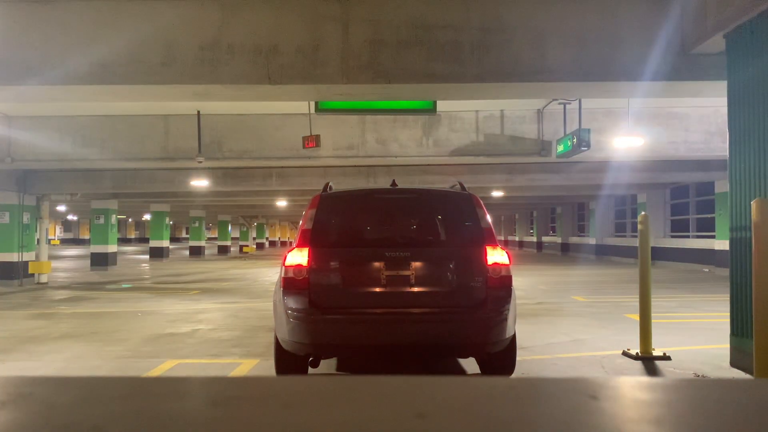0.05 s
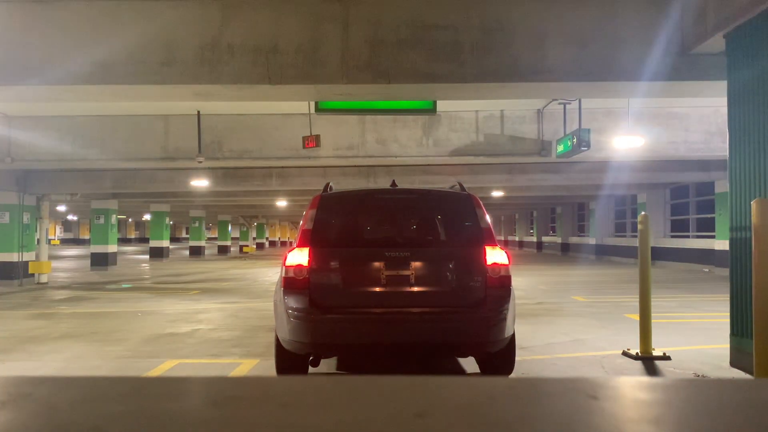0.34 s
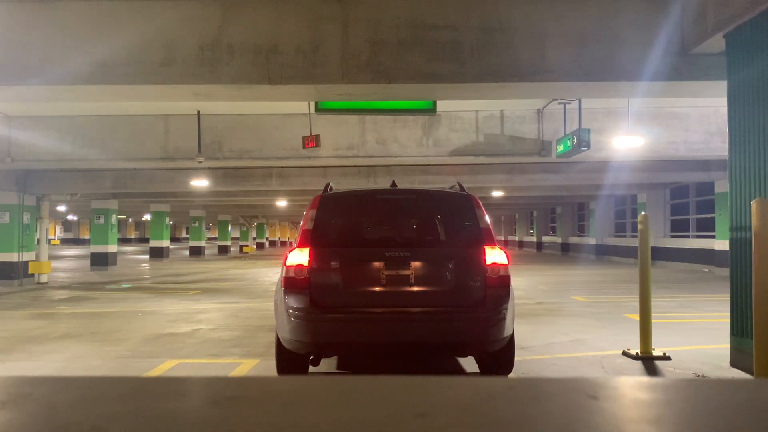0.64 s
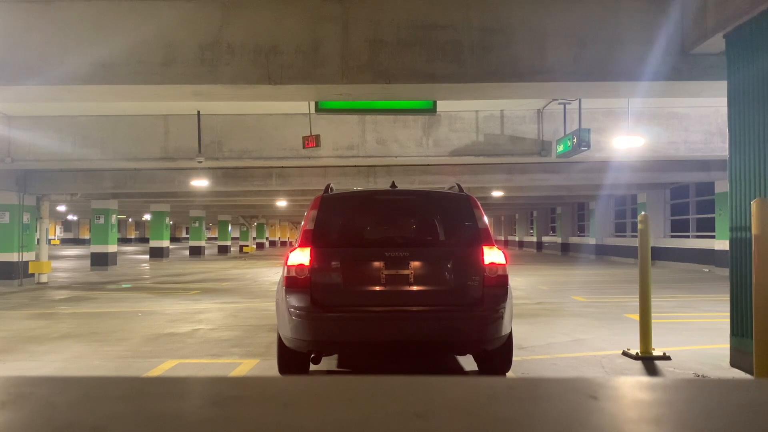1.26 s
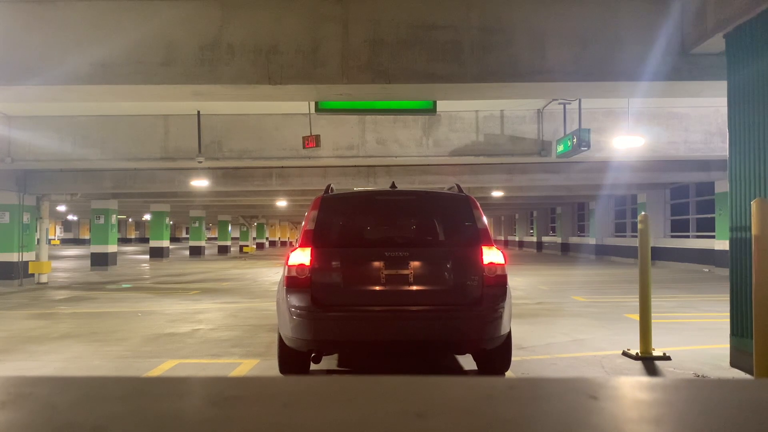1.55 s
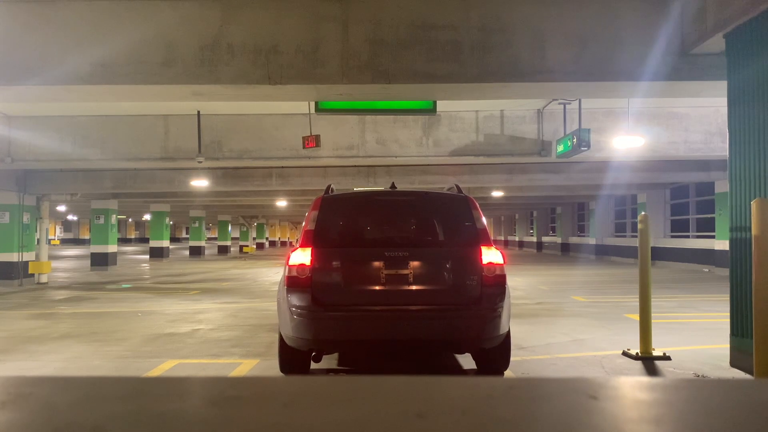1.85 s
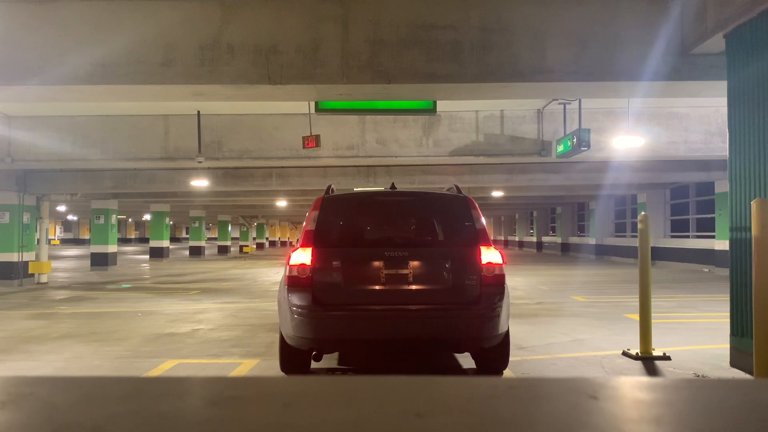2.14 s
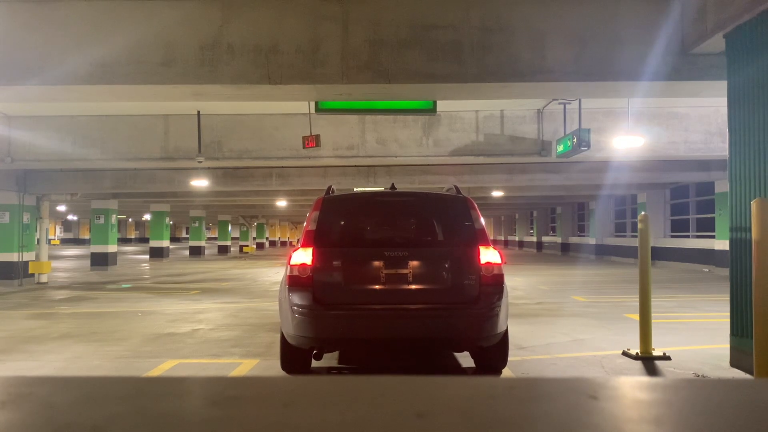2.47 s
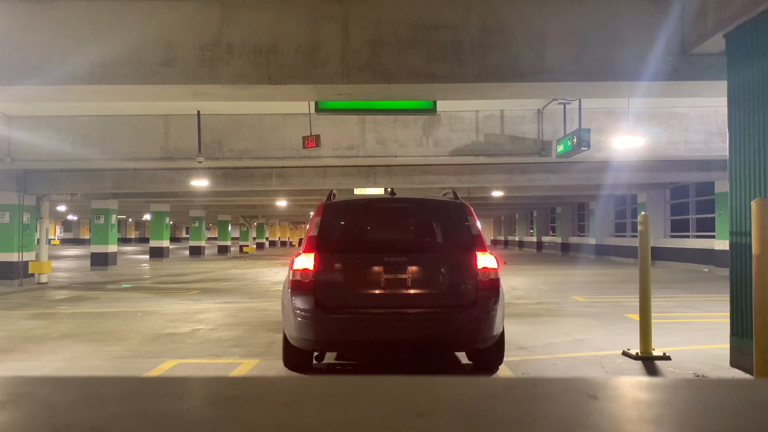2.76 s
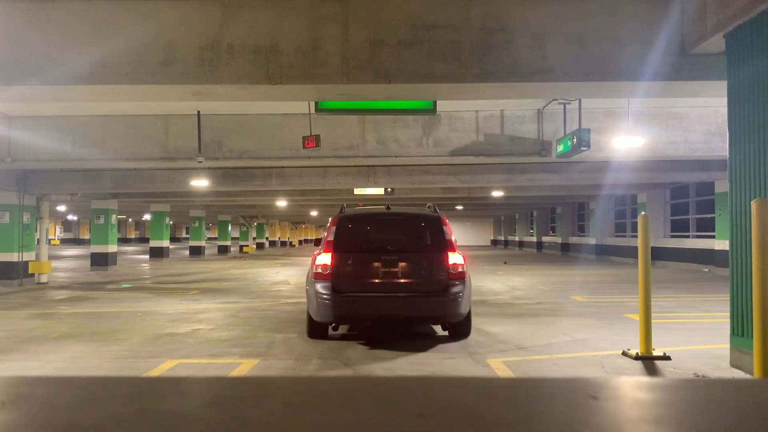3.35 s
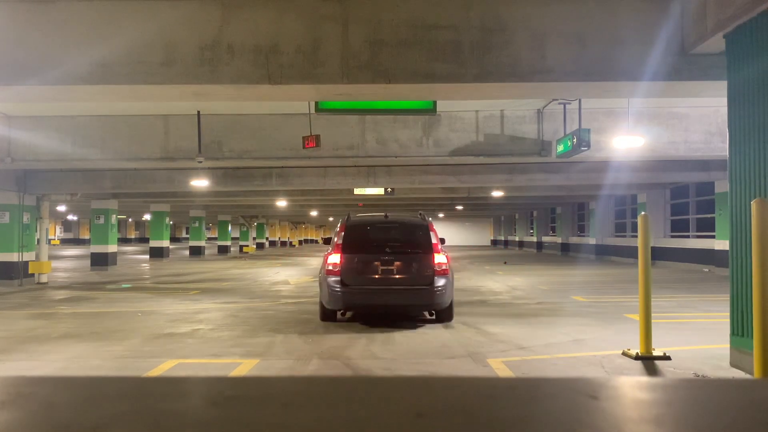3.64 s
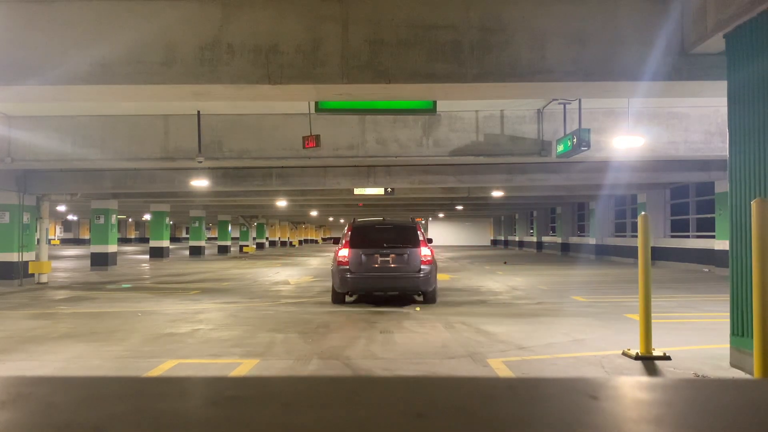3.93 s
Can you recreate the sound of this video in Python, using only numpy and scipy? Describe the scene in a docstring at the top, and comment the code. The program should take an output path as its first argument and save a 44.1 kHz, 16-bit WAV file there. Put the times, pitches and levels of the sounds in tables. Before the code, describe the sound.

A car engine rumbles low a few metres ahead in a concrete parking garage, slowly rises, then revs hard. A tyre chirps twice in quick succession and the car drives off, its growl echoing around the hall.

```python
"""In a concrete parking garage, a five-cylinder car creeps, revs and pulls away a few metres ahead.
The exhaust drones at the rate the cylinders fire, and their unequal strength adds a growl.
The air intake and fan roar and hiss as the engine works harder. A tyre chirps twice as it grips,
its tread sticking and slipping on the floor. The low hall booms and rings on behind the car."""
import sys
import numpy as np
from scipy import signal
from scipy.fft import rfft, irfft
from scipy.io import wavfile
from scipy.ndimage import uniform_filter1d, minimum_filter1d, map_coordinates

SR = 44100
rng = np.random.default_rng(int(sys.argv[2]) if len(sys.argv) > 2 else 0)


def put_to_file(sound):
    """Save the sound as 16-bit audio at rate SR, in the file named by the first command-line argument."""
    columns = np.atleast_2d(sound).T  # one column per channel
    safe = np.clip(columns, -1, 1)
    whole_steps = np.round(safe * 32767)
    wavfile.write(sys.argv[1], SR, whole_steps.astype(np.int16))


N = 176400
TIME_S = np.arange(N) / SR
CYLINDERS = 5
HALL_FADE_S = 3.8  # time for the garage's echo to fall by 60 dB

# How often the cylinders fire: time_s, rate_hz
FIRING_RATE = [(0, 55.53), (.15, 65.13), (.32, 69.63), (.8, 70.25), (1.25, 73.23), (1.45, 80.2),
               (1.65, 88.3), (1.83, 89.8), (2.05, 95.46), (2.31, 97.17), (2.42, 111), (2.54, 132.6),
               (2.66, 146), (2.82, 150.2), (2.95, 141.2), (3.07, 130.4), (3.42, 133.6), (3.55, 127.4),
               (3.66, 119), (3.82, 134.2), (4, 153.3)]
def engine_speed():
    """The firing rate, slightly unsteady, and its phase, which goes round once for each firing."""
    firing_hz = curve(FIRING_RATE) * (1 + 0.0021 * drift(12.114))
    return firing_hz, 2 * np.pi * np.cumsum(firing_hz) / SR


# Exhaust tones at 1 to 4 times the firing rate: time_s, tone1_db, tone2_db, tone3_db, tone4_db
EXHAUST_LEVELS = [(0,-32,-57,-17.5,-50), (.06,-19.5,-46,-20.5,-29.5), (.19,-11,-36,-25.5,-34),
                  (.28,-22,-47,-30.5,-55), (.36,-20,-36,-27.5,-23.5), (.43,-20,-34,-27.5,-36),
                  (.7,-17,-27,-36,-33.5), (1.1,-15.5,-28,-26.5,-29), (1.25,-21,-26,-25,-23.5),
                  (1.32,-21.5,-42,-43,-32.5), (1.47,-22,-18.5,-26,-30.5), (1.6,-19.5,-20.5,-28,-43),
                  (1.7,-17.5,-18,-27,-46), (1.81,-27,-12,-57,-30.5), (1.88,-27,-31.5,-22,-45),
                  (2.0,-29,-29,-25,-50), (2.1,-26,-22,-20,-49), (2.29,-26,-25.5,-18.5,-66),
                  (2.4,-17,-14,-17.5,-51), (2.52,-19,-15.5,-34.5,-51), (2.565,-13,-39,-45,-32.5),
                  (2.62,-11,-13,-34,-48), (2.7,-11,-14,-27,-37), (2.82,-20.5,-14,-53,-50),
                  (2.95,-17,-29,-36,-59), (3.05,-20,-24,-33,-59), (3.26,-11.5,-30,-69,-80),
                  (3.43,-26.5,-21.5,-43,-56), (3.55,-15,-16.5,-24.5,-47), (3.63,-23.5,-25.5,-29,-49),
                  (3.74,-23.5,-21,-32,-41), (3.82,-25.5,-18.5,-42,-33.5), (3.97,-17,-21.5,-41,-52)]
def exhaust(firing_hz, phase, ring_hz=302.23):
    """Puffs of gas make four tones that flutter as the engine works harder and ring in the garage."""
    effort = np.clip((firing_hz - 85) / (130 - 85), 0, 1)  # grows from 85 to 130 firings a second
    tones = 0
    for k in range(1, 5):
        level_db = curve(EXHAUST_LEVELS, column=k) - 1 + drift(16) + 2.2 * effort * drift(42)
        tones += from_db(level_db) * np.sqrt(2) * np.sin(k * phase + rng.uniform(0, 2 * np.pi))
    without_bass = signal.sosfilt(signal.butter(2, 165, "high", fs=SR, output="sos"), tones)
    ring = signal.lfilter(*signal.iirpeak(ring_hz, Q=7.52, fs=SR), tones)
    return tones * pan(0.94) + from_db(-11) * hall_echo(without_bass + from_db(-3.5) * ring)


# How loud the growl is: time_s, level_db
GROWL_LEVELS = [(0, -28), (.4, -32.5), (.7, -30.5), (1.25, -32), (1.55, -30), (1.85, -29.5), (2.2, -33.5),
                (2.45, -24.5), (2.68, -20), (2.82, -24), (3.1, -22.5), (3.4, -21), (3.7, -30), (3.88, -19),
                (4, -29)]
# How strong its low and high parts are: pitch_hz, level_db
GROWL_COLOUR = [(20, -38), (38, -4), (55, 2), (80, -1), (110, -2.5), (175, 8), (240, -0.5), (315, 5.5),
                (380, -17), (480, -17.5), (700, -42), (1000, -38), (3000, -71)]
# Growl tones made louder or softer: multiple_of_cycle_rate, change_db
GROWL_ACCENTS = [(2, 2), (7, -2.5), (8, 6), (12, 7)]
def growl(firing_hz, phase):
    """Unequal cylinders repeat their pattern every five firings (one cycle), adding tones over a rumble."""
    tones, accent_db = 0, dict(GROWL_ACCENTS)
    for k in range(2, 32):
        if k % CYLINDERS == 0 and k <= 4 * CYLINDERS:
            continue  # the exhaust plays these
        pitch_hz = firing_hz * k / CYLINDERS
        gain = gain_at(GROWL_COLOUR, pitch_hz) * from_db(accent_db.get(k, 0) + drift(6.6))
        angle = k * phase / CYLINDERS + 0.57 * drift(5) + rng.uniform(0, 2 * np.pi)
        tones += gain * widen(np.sin(angle), np.sin(angle + 2 * drift(4.5)), pitch_hz)
    tones = normalise(tones * np.sqrt(firing_hz))
    rumble = from_db(-5.5) * noise(GROWL_COLOUR)
    return from_db(curve(GROWL_LEVELS)) * (from_db(1) * tones + rumble)


# The howl swells as the throttle opens: time_s, level_db
HOWL_LEVELS = [(0, -49), (2.1, -46), (2.35, -45.5), (2.55, -30.5), (2.73, -33.5), (2.8, -45), (3.3, -42),
               (3.65, -41), (4, -35)]
# The intake rings most near 900 Hz: pitch_hz, level_db
HOWL_COLOUR = [(300, -51), (650, -14), (735, 0.5), (790, -10), (880, 4.5), (925, -2.5), (975, -0.5),
               (1070, -10), (1500, -21), (4000, -57)]
def intake_howl(firing_hz, phase):
    """High engine tones slide through the pitches at which the air intake rings, over rushing air."""
    tones = 0
    for k in range(16, 48):
        angle = k * phase / CYLINDERS + drift(14) + rng.uniform(0, 2 * np.pi)
        gain = gain_at(HOWL_COLOUR, firing_hz * k / CYLINDERS)
        tones += gain * np.sin([angle, angle + drift(8.8)])
    tones = normalise(tones * np.sqrt(firing_hz))
    air = from_db(-7) * noise(HOWL_COLOUR)
    return from_db(curve(HOWL_LEVELS)) * (from_db(-.5) * tones + air)


# How loud the rushing air is: time_s, roar_db, hiss_db
RUSH_LEVELS = [(0, -44.5, -58), (.45, -42.5, -55.5), (.9, -43, -56), (1.3, -43, -54), (1.5, -39.5, -52.5),
               (2.05, -39.5, -50.5), (2.3, -36.5, -50.5), (2.47, -31, -45), (2.62, -30.5, -41),
               (2.75, -24, -39.5), (2.9, -32, -44.5), (3.1, -32.5, -45), (3.35, -30.5, -42),
               (3.53, -30, -41.5), (3.7, -31.5, -43.5), (4, -30.5, -43.5)]
# The low roar: pitch_hz, level_db
ROAR_COLOUR = [(150, -21), (330, 5), (420, 4.5), (490, -1), (565, 4.5), (670, -0.5), (880, -5.5),
               (1150, -6), (1400, -8.5), (1900, -16), (2600, -19.5), (4000, -33)]
# The bright hiss: pitch_hz, level_db
HISS_COLOUR = [(900, -6), (2000, 17), (3300, 19), (4200, 16.5), (5300, 12), (6600, 15.5), (8200, 5.5),
               (10700, 13.5), (12300, 8.5)]
def rushing_air(phase, duck_s=2.745, fall_s=.012, recovery_s=0.52):
    """Moving gas roars and hisses, throbbing with each firing.
    Roar and hiss duck suddenly, then recover, as the recorder turns down for the loud chirp."""
    sway_db = 0.74 * np.sin(phase / CYLINDERS)  # from the unequal cylinders
    roar = noise(ROAR_COLOUR) * from_db(curve(RUSH_LEVELS) + 2 + drift(25.15) + sway_db)
    roar *= 1 + 0.05 * np.sin(phase)
    hiss = noise(HISS_COLOUR) * from_db(curve(RUSH_LEVELS, column=2) + 3.5 + .5 * drift(23.26))
    hiss *= 1 + 0.064 * np.sin(phase)
    age_s = np.maximum(TIME_S - duck_s, 0)
    dip_db = -6.5 * np.minimum(age_s / fall_s, 1) * np.exp(-age_s / recovery_s)
    return (roar + hiss) * from_db(dip_db)


# Tyre chirps: start_s, level_db, first_hz, last_hz, slide_s, rise_s, fade_db_per_s, hold_s, scrub_db
CHIRPS = [(2.715, -2.5, 1680, 1603, .022, .028, 215, .082, -15),
          (2.828, -6.5, 1735, 1582, .032, .023, 52, .064, -21)]
# Their echoes from far walls: delay_s, level_db
WALL_ECHOES = [(.245, -26), (.58, -23.5), (.765, -27)]
def tyre_chirps(release_s=.032):
    """Rubber sticks and slips on smooth concrete: rough, falling whistles bounce off ceiling and walls."""
    direct, scattered = np.zeros((2, N))
    for start_s, level_db, first_hz, last_hz, slide_s, rise_s, fade_db_per_s, hold_s, scrub_db in CHIRPS:
        age_s = np.maximum(TIME_S - start_s, 0)
        pitch_hz = last_hz + (first_hz - last_hz) * np.exp(-age_s / slide_s)
        phase = 2 * np.pi * np.cumsum(pitch_hz * (1 + .005 * drift(150))) / SR
        shape_db = np.minimum(24 * (age_s / rise_s - 1), fade_db_per_s * (rise_s - age_s))
        gate = (age_s > 0) * np.exp(-np.maximum(age_s - hold_s, 0) / release_s)
        loudness = gate * from_db(level_db - 3.5 + shape_db + drift(120))
        scrub = drift(400) * np.sin(phase) + drift(370) * np.cos(phase)  # noise around the whistle
        direct += loudness * (np.sin(phase) + from_db(scrub_db) * scrub)
        rasp = drift(420) * np.sin(1.96 * phase) + drift(420) * np.cos(1.96 * phase)  # near the octave
        scattered += loudness * (from_db(-17.5) * rasp + from_db(-7) * scrub)
    ceiling = from_db(-16.5) * direct
    walls = sum(from_db(level_db) * delay(direct, delay_s) for delay_s, level_db in WALL_ECHOES)
    bounces = hall_echo(ceiling + walls, fade_s=0.18)
    tail = from_db(-15.5) * hall_echo(direct + scattered)
    at_ears = np.array([delay(direct, .00011), direct]) * pan(-1.5)  # a little to the right
    return at_ears + bounces + tail


# How loud the deep boom is: time_s, level_db
BOOM_LEVELS = [(0, -18), (.2, -32.5), (.58, -30), (.8, -37), (1.25, -34), (1.55, -32), (1.85, -31),
               (2.1, -31), (2.601, -34), (3.0, -56), (3.35, -26), (3.6, -28.5), (4, -29)]
# The boom is strongest near 66 Hz: pitch_hz, level_db
BOOM_COLOUR = [(20, -37), (36, -10), (50, -8), (66, 3), (85, -6), (130, -44), (400, -99)]
# The drone grows when the engine works hard: time_s, level_db
DRONE_LEVELS = [(0, -38.5), (0.799, -44.5), (1.3, -54), (1.55, -39), (1.85, -28), (2.25, -37), (2.4, -25.5),
                (2.7, -18), (2.95, -49), (3.15, -46), (3.35, -22), (3.7, -22), (4, -24)]
# The drone is strongest near 300 Hz: pitch_hz, level_db
DRONE_COLOUR = [(150, -24), (255, -0.5), (305, 1.5), (355, -4.5), (420, -9), (500, -22), (700, -36),
                (2000, -82)]
def garage_boom():
    """A deep boom and a hollow drone fill the garage around the car."""
    boom = noise(BOOM_COLOUR) * from_db(curve(BOOM_LEVELS))
    drone = noise(DRONE_COLOUR) * from_db(curve(DRONE_LEVELS))
    return boom + drone


# Faint whines: start_s, length_s, pitch_hz, level_db
WHINES = [(0, 2.2, 6381, -70), (0, 2.2, 1385, -62), (.27, .24, 5221, -67), (.22, .3, 3060, -61),
          (.6, .28, 5221, -65), (1.66, .3, 3060, -57.5), (2.41, .22, 3660, -48)]
def machinery_whines():
    """Running machinery gives thin, wavering tones that swell and fade."""
    whines = 0
    for start_s, length_s, pitch_hz, level_db in WHINES:
        swell = np.sin(np.pi * np.clip((TIME_S - start_s) / length_s, 0, 1))
        angle = 2 * np.pi * pitch_hz * TIME_S + np.array([drift(55), drift(55)])
        whines += swell * from_db(level_db + 2 * drift(7.15)) * np.sqrt(2) * np.sin(angle)
    return whines


def hall_echo(sound, fade_s=HALL_FADE_S, gap_s=0.0116):
    """Countless bounces off concrete blur into a fading tail, different at each ear."""
    tail = rng.standard_normal((2, N)) * np.exp(-np.log(1000) * TIME_S / fade_s) * (TIME_S > gap_s)
    return signal.fftconvolve(sound[None], normalise(tail) / np.sqrt(N), axes=1)[:, :N]


# How wide the hall sounds, as the side part's level against the middle: pitch_hz, side_db
HALL_WIDTH = [(60, -13), (130, -0.5), (280, -10.5), (500, 1), (1000, -3), (4000, -1), (9000, 3),
              (14000, -1.5)]
def widen(middle, side, pitch_hz):
    """Both ears share the middle; the side part is added on the left and taken away on the right."""
    width = gain_at(HALL_WIDTH, pitch_hz)
    return np.array([middle + width * side, middle - width * side])


def noise(colour):
    """Stereo noise whose balance of low and high pitches follows a colour table."""
    pitch_hz = np.arange(N // 2 + 1) * SR / N
    middle, side = rfft(rng.standard_normal((2, N))) * gain_at(colour, pitch_hz)
    stereo = irfft(widen(middle, side, pitch_hz), N)
    return stereo / stereo.mean(axis=0).std()


def from_db(level_db):
    """Turn decibels into a number to multiply by."""
    return 10 ** (np.asarray(level_db) / 20)


def normalise(sound):
    """Scale to an average strength (rms) of 1."""
    return sound / np.sqrt(np.mean(sound ** 2))


def curve(table, column=1):
    """Join the points of a time table with straight lines."""
    rows = np.array(table)
    return np.interp(TIME_S, rows[:, 0], rows[:, column])


def gain_at(table, pitch_hz):
    """Look up how strong a pitch is in a table of pitches and levels."""
    rows = np.array(table)
    return from_db(np.interp(np.log(pitch_hz + 1e-9), np.log(rows[:, 0]), rows[:, 1]))


def drift(rate_hz):
    """A random wobble of about 1 that changes course rate_hz times a second."""
    points = rng.standard_normal(4096)
    return normalise(np.interp(TIME_S * rate_hz, np.arange(len(points)), points))


def pan(left_db):
    """Gains that put the left ear left_db above the right."""
    return from_db(np.array([[left_db], [-left_db]]) / 2)


def delay(sound, delay_s):
    """The same sound, arriving later."""
    return map_coordinates(sound, [np.arange(N) - delay_s * SR])


def scene():
    """One engine speed drives exhaust, growl, howl and throb; garage, whines and tyre join in."""
    firing_hz, phase = engine_speed()
    engine = exhaust(firing_hz, phase) + growl(firing_hz, phase) + intake_howl(firing_hz, phase)
    return engine + garage_boom() + rushing_air(phase) + machinery_whines() + tyre_chirps()


def record(dry, peak_limit=.92, dull_hz=12400, top_hz=15800):
    """The microphone softens the treble, a limiter turns down the peaks and the very top is cut."""
    dulled = signal.sosfilt(signal.butter(2, dull_hz, fs=SR, output="sos"), dry)
    window = int(.02 * SR)
    needed_gain = peak_limit / np.maximum(np.abs(dulled).max(axis=0), peak_limit)
    smooth_gain = uniform_filter1d(minimum_filter1d(needed_gain, window), window)
    return signal.sosfilt(signal.ellip(8, .2, 70, top_hz, fs=SR, output="sos"), dulled * smooth_gain)


dry = scene()
out = record(dry)
put_to_file(out)
```